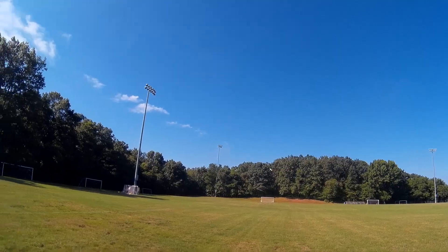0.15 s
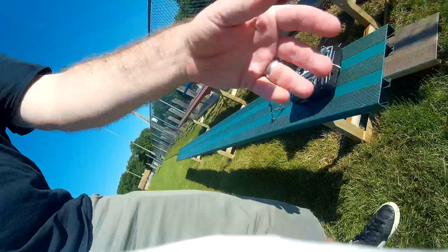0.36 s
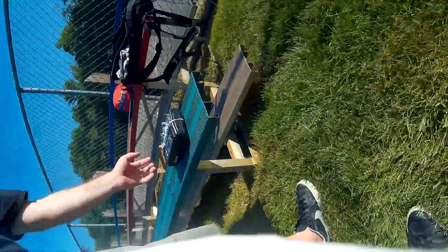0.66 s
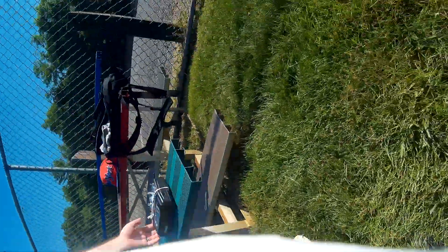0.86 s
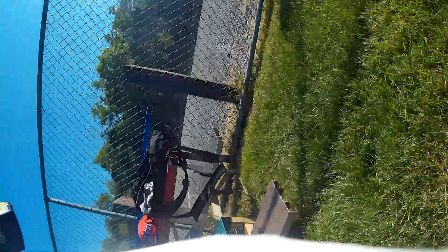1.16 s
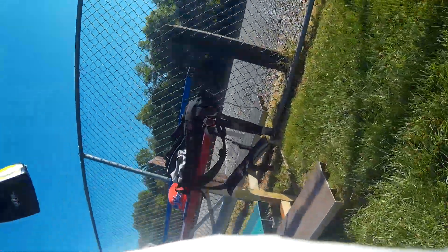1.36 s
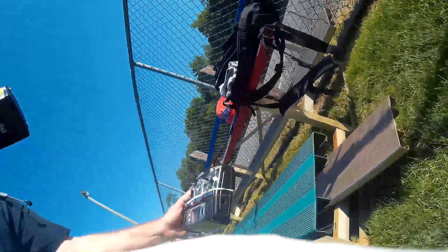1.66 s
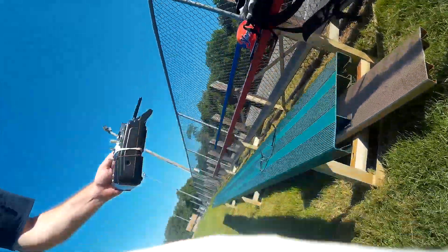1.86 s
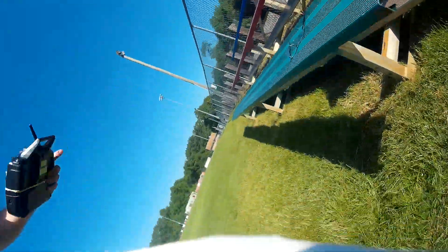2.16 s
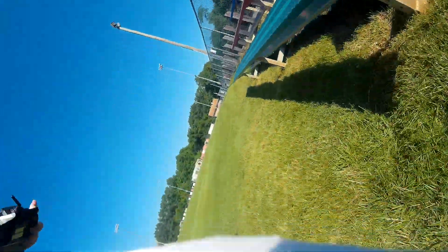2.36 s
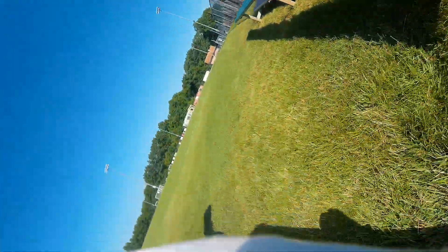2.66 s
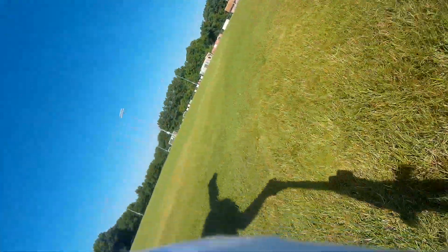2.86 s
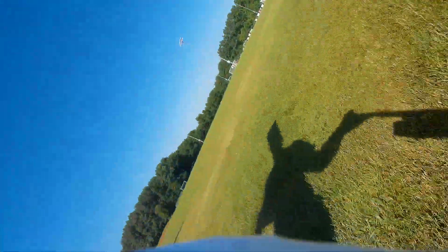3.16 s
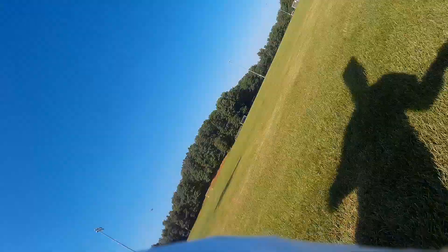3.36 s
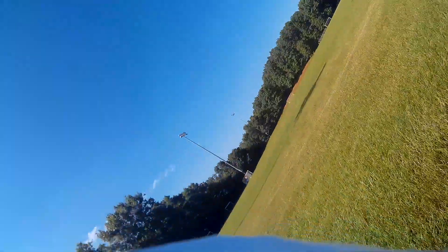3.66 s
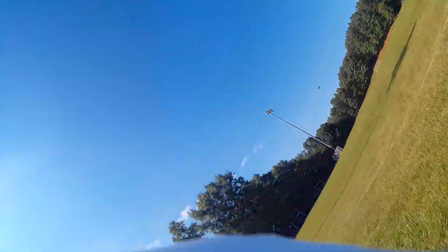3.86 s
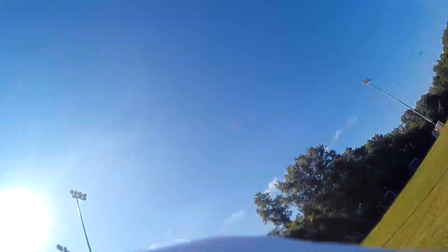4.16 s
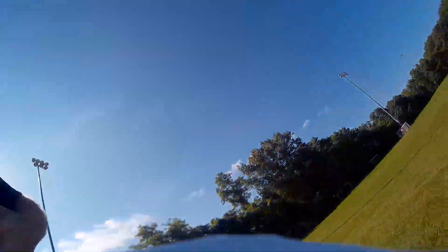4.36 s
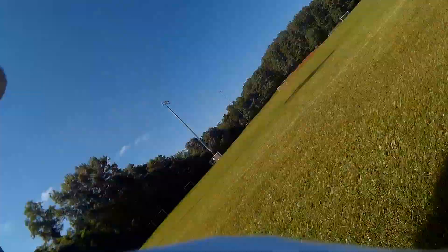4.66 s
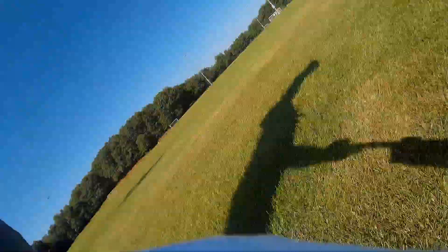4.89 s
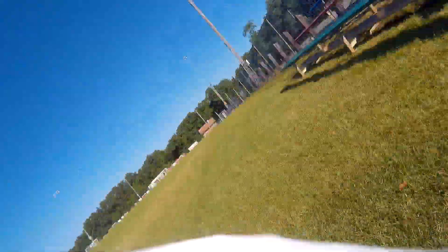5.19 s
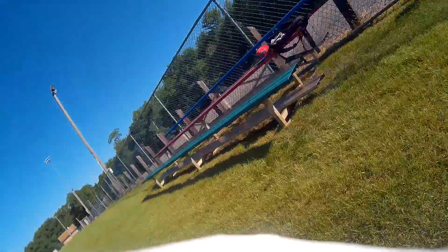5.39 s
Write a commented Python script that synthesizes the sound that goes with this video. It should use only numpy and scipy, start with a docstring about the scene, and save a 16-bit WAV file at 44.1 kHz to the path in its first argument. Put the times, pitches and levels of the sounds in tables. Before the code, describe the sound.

Faint breeze, bird chirps and handling ticks, then one sudden close blip of a small electric motor and propeller, cracking once and coasting to a stop.

```python
"""A light wind crosses an open field with birds, small handling ticks and a knock on a metal bench.
Then a model plane's brushless motor is blipped once, right beside the microphone on the airframe.
It kicks, rattles and squeals up to speed, the propeller buzzes, and it runs down under the controller's thin whistle.
One shaft angle times the motor, propeller and whistle; filtered noise, ringing modes and gliding tones make the rest."""
import sys
import numpy as np
from scipy import signal
from scipy.fft import rfft, irfft
from scipy.io import wavfile
from scipy.ndimage import uniform_filter1d

SR = 44100
rng = np.random.default_rng(int(sys.argv[2]) if len(sys.argv) > 2 else 0)


def log_audio(samples):
    """Write samples as a 16-bit WAV file to the path given in sys.argv[1]."""
    # one column per channel
    frames = np.atleast_2d(samples).T
    # limit to full scale, then quantise
    limited = np.clip(frames, -1, 1)
    pcm = np.round(limited * 32767).astype(np.int16)
    wavfile.write(sys.argv[1], SR, pcm)


N = 243873
TIME = np.arange(N) / SR
STOP_S = 4.815  # the rotor comes to rest

# motor drive, with a hesitation and then the cut: t/s, share of full drive
THROTTLE = [(3.562, 0.98), (3.575, 0.48), (3.6, 0.74), (3.64, 0.91), (3.8, 1), (3.95, 0)]
# shaft speed under power: t/s, rate/(turns per s)
SPIN_UP = [(3.39, 4.4), (3.46, 24.5), (3.55, 38.3), (3.61, 43.5), (3.65, 51.7), (3.7, 66.2), (3.75, 91.4),
           (3.8, 106.3), (3.87, 109)]
# short gliding tones: bearing squeals, and last a falling 6 kHz tone, perhaps the controller's:
# t/s, length/s, first f/Hz, last f/Hz, rms level before fades/dB, fall per overtone/dB
GLIDES = [(3.442, 0.019, 688, 780, -19.5, -14.5), (3.459, .014, 946, 990, -18.5, -10),
          (3.497, 0.011, 771, 700, -22, -5), (3.522, 0.022, 697, 802, -22.5, -7),
          (3.542, 0.02, 797, 824, -20, -5.5), (3.626, .057, 1000, 1028, -21, -3.5),
          (3.67, 0.034, 2570, 2684, -23, -11), (3.769, .07, 6030, 5616, -31.5, -35)]


def amp(db):
    """Turns decibels into an amplitude factor."""
    return 10 ** (np.asarray(db) / 20)


def unit(x):
    """Scales a sound to rms 1."""
    return x / np.sqrt(np.mean(x ** 2) + 1e-20)


def add(mix, s, sound):
    """Lays a sound into the mix at s seconds."""
    part = mix[max(round(s * SR), 0):][:len(sound)]
    part += sound[:len(part)]


def curve(rows):
    """Joins rows of t/s and value by straight lines in time."""
    return np.interp(TIME, *np.transpose(rows))


def during(start, end, fade=.004):
    """A gate with soft edges, all in seconds."""
    return np.clip((TIME - start) / fade, 0, 1) * np.clip((end - TIME) / fade, 0, 1)


def shape(points):
    """Makes rows of f/Hz and level/dB into a gain over frequency."""
    f, db = np.transpose(points)
    return lambda hz: amp(np.interp(np.log(hz + 1), np.log(f + 1), db))


def colour(x, gain, size=8192):
    """Minimum-phase filter with the given gain, so that clicks ring only afterwards."""
    log_gain = np.log(np.maximum(gain(abs(np.fft.fftfreq(size, 1 / SR))), 1e-5))
    spectrum = np.exp(np.conj(signal.hilbert(log_gain)))
    taps = np.fft.ifft(spectrum).real[:size // 2]
    return signal.oaconvolve(x, taps)[:len(x)]


def drift(hz):
    """Smooth random wander of rms 1, rolling off around the given rate."""
    rolloff = np.exp(-(np.fft.rfftfreq(N, 1 / SR) / hz) ** 2)
    return unit(irfft(rfft(rng.standard_normal(N)) * rolloff, N))


def steady(x, size=1100):
    """Evens a sound out to about rms 1, so that a level curve can play it."""
    power = uniform_filter1d(uniform_filter1d(x ** 2, size), size)
    return x / np.sqrt(abs(power) + 1e-5 * np.mean(x ** 2))


def pulses(cycles):
    """One click at each whole cycle, shared between the two nearest samples."""
    step = np.diff(cycles, prepend=cycles[0])
    hit = np.diff(np.floor(cycles), prepend=np.floor(cycles[0])) > 0
    early = hit * (cycles % 1) / np.maximum(step, 1e-9)
    return hit - early + np.roll(early, -1)


def blows(rows, gain, size=4096):
    """Single pushes, rows of t/s and peak level/dB, on a body with the given gain."""
    ring, out = colour(signal.unit_impulse(size), gain), np.zeros(N)
    for s, db in rows:
        add(out, s, amp(db) * ring / abs(ring).max())
    return out


def airframe(hz):
    """Gain of the resonances of the motor mount and fuselage."""
    # resonances: f/Hz, full width at half amplitude/Hz, relative level/dB
    resonances = [(464, 130, -0.5), (768, 202, 5.5), (1020, 520, 0), (1578, 400, -1), (2000, 82, -5.5),
                  (2970, 500, -7), (4230, 1000, -16.5), (5280, 180, -17.5), (5720, 1600, -17),
                  (11100, 2300, -46.5)]
    return np.sqrt(sum((amp(db) / (1 + ((hz - f) / (width / 2)) ** 2)) ** 2 for f, width, db in resonances))


def field_hush(level_db=-69.5):
    """The even hush of the open field: steady filtered noise."""
    # tone of the field: f/Hz, relative level/dB
    field_tone = [(12, -44.5), (20, -16), (126, -6), (350, -23.5), (413, -18), (591, -21.5), (3080, -27.5),
                  (4290, -27.5), (5200, -27), (5810, -29.5), (12500, -30.5), (14400, -34)]
    return unit(colour(rng.standard_normal(N), shape(field_tone))) * amp(level_db)


def low_swells(calm_db=-70.5, lumps_db=1.5):
    """Lumpy low noise that swells and fades: puffs of wind, and at 3.2 s a hand rubbing the fuselage."""
    # tone of the swells: f/Hz, relative level/dB
    low_tone = [(12, -30.5), (25, -4.5), (70, -3.5), (120, -7.5), (200, -12), (450, -23.5), (900, -26.5),
                (1700, -29.5), (2500, -60)]
    # puffs of wind, and at 3.2 s the rub of a hand: peak t/s, rise/s, fall/s, level/dB
    swells = [(.7, .25, 0.19, -63.5), (1.43, .1, 0.25, -52.5), (3.2, 0.096, 0.18, -55),
              (4.65, .5, 0.41, -53.5), (5.41, .15, .09, -55.5)]
    lumpy = unit(colour(rng.standard_normal(N), shape(low_tone)) * amp(lumps_db * drift(21)))
    levels = [amp(db) * np.exp(-np.maximum((s - TIME) / rise, (TIME - s) / fall)) for s, rise, fall, db in swells]
    # a calm breeze stays between the swells
    return lumpy * np.sqrt(amp(calm_db) ** 2 + np.sum(np.square(levels), axis=0))


def birds(rasp=0.13, linger=1.6, echo_db=-6.0, echo_t60=0.5):
    """Gliding whistles that linger near their top pitch, some raspy, with an echo from the trees."""
    # bird notes: t/s, length/s, first f/Hz, last f/Hz, level/dB, roughness as a share of rasp
    notes = [(0.062, 0.2, 5260, 5100, -87, 0.1), (.425, 0.056, 5400, 5220, -74, .2),
             (0.611, .07, 3480, 3090, -68.5, .16), (.66, .074, 3180, 2750, -54.5, 0.17),
             (0.778, 0.037, 3900, 2330, -68.5, 1.11), (1.503, 0.087, 2790, 2410, -68.5, 0.2),
             (1.599, 0.078, 2750, 2950, -76, 0.2), (1.664, .045, 1740, 2950, -74, 0.1),
             (1.871, 0.048, 3060, 3590, -72.5, 0.48), (1.899, 0.12, 4030, 4290, -73, 0.18),
             (1.997, 0.048, 5330, 5580, -76, 0.26), (2.683, .063, 3550, 2280, -70, 0.2),
             (2.796, .032, 2700, 2250, -72.5, .1), (2.903, 0.11, 3720, 3950, -80, 0.44),
             (5.243, 0.052, 4750, 3750, -64.5, 0.54), (5.303, 0.061, 5260, 6400, -69.5, 0.68),
             (5.419, 0.0274, 1710, 2550, -68, 0), (5.431, 0.078, 2520, 2715, -57.5, 0.3)]
    out = np.zeros(N)
    for s, length, first_hz, last_hz, db, rough in notes:
        count = int(length * SR)
        top_hz, span_hz = max(first_hz, last_hz), abs(last_hz - first_hz) + 1
        below = (top_hz - np.linspace(first_hz, last_hz, count)) / span_hz
        glide_hz = top_hz - span_hz * abs(below) ** linger
        hz = glide_hz * (1 + rasp * rough * drift(600)[:count])
        whistle = np.sin(2 * np.pi * np.cumsum(hz) / SR)
        add(out, s, amp(db) * unit(whistle * signal.windows.tukey(count, .6)))
    trees = rng.standard_normal(SR) * amp(-60 * TIME[:SR] / echo_t60)
    return out + amp(echo_db) * signal.oaconvolve(out, trees / np.linalg.norm(trees))[:N]


def ticks(spread=0.54):
    """Sharp ticks of plastic and grit: tiny dying bursts of noise, each around its own pitch."""
    # ticks: t/s, peak level/dB, centre f/Hz, time to fall 60 dB/s
    clicks = [(.526, -54.5, 6000, 0.011), (0.586, -57, 1500, 0.044), (.714, -49.5, 970, 0.18),
              (0.74, -56, 1970, .04), (0.938, -52.5, 1610, 0.029), (1.013, -55.5, 1170, 0.08),
              (1.089, -51, 1390, 0.048), (1.16, -53, 1840, 0.024), (1.2837, -41.5, 11000, 0.0065),
              (1.334, -46.5, 5760, .03), (1.387, -53, 4500, 0.021), (2.014, -57, 800, 0.034),
              (3.133, -54.5, 4080, 0.027), (3.314, -55, 3500, 0.022), (4.543, -50, 5400, .015)]
    out, t = np.zeros(N), TIME[:SR // 10]
    for s, db, centre_hz, t60 in clicks:
        burst = rng.standard_normal(len(t)) * amp(-60 * t / t60)
        tick = colour(burst, lambda hz: 1 / (1 + (np.log((hz + 1) / centre_hz) / spread) ** 2))
        add(out, s, amp(db) * tick / abs(tick).max())
    return out


def rustles(grain_db=3, grain_hz=40):
    """Faint, uneven swells of rubbing, perhaps clothes and grass: grainy filtered noise."""
    # swells: peak t/s, half length/s, level/dB
    strokes = [(0.747, 0.096, -67.5), (1.065, .12, -69), (1.974, 0.11, -70.5), (2.805, 0.16, -72)]
    # tone of the rubbing: f/Hz, relative level/dB
    rub_tone = [(200, -22), (500, -2), (800, -1), (1350, -0.5), (1750, -5), (2200, -21), (5000, -14),
                (12000, -38)]
    level = sum(amp(db) * np.exp(-((TIME - s) / half) ** 2) for s, half, db in strokes)
    return unit(colour(rng.standard_normal(N), shape(rub_tone)) * amp(grain_db * drift(grain_hz))) * level


def bench(s=1.334, ring_db=-46.5, clatter_db=-47, clatter_t60=0.59,
          blow_db=-33, blow_hz=1480, blow_t60=0.039, rise_s=0.00064):
    """A knock on the metal bench: a hard, short note, a dense clatter and a few lasting modes."""
    # ringing modes: f/Hz, level relative to ring_db/dB, time to fall 60 dB/s
    modes = [(515, -13.5, 1.3), (707, -13.5, 0.74), (730, -21, 0.66), (953, -5, 0.82), (1103, -7.5, 0.54),
             (1342, 0, 0.14), (1400, -14.5, 1.26), (1530, -14, 0.51), (1730, -5, 0.37), (1760, -7, 0.24),
             (2120, -11, 0.16)]
    # tone of the clatter: f/Hz, relative level/dB
    clatter_tone = [(88, -48), (150, -4), (359, -9), (449, -12), (524, -8.5), (938, -4.5), (1190, -4),
                    (1410, -5.5), (2450, -20), (2760, -16), (9000, -53), (11700, -73), (19800, -120)]
    out, t = np.zeros(N), TIME[:SR]
    ring = sum(amp(db - 60 * t / t60) * np.sin(2 * np.pi * (hz * t + rng.random())) for hz, db, t60 in modes)
    blow = amp(blow_db - 60 * t / blow_t60) * np.sin(2 * np.pi * blow_hz * t)
    noise = unit(colour(rng.standard_normal(SR), shape(clatter_tone)))
    clatter = amp(clatter_db - 60 * t / clatter_t60) * noise
    add(out, s, (amp(ring_db) * ring + blow + clatter) * np.minimum(t / rise_s, 1))
    return out


def bumps():
    """Soft bumps of the hand, each a dull push on the fuselage."""
    # bumps: t/s, peak level/dB
    pushes = [(1.724, -53.5), (3.139, -46.5), (3.175, -41.5), (3.19, -42), (3.208, -47), (3.2225, -38),
              (3.315, -42), (5.011, -51.5)]
    # tone of a push: f/Hz, relative level/dB
    thud_tone = [(30, -31), (130, 5.5), (350, 2.5), (800, -14.5), (1600, -23), (3000, -41), (12000, -66)]
    return blows(pushes, shape(thud_tone))


def shaft(friction_hz_per_s=54, drag_per_turn=.024):
    """Turns per second: driven up to speed, then slowed by friction plus air drag x rate squared."""
    cut_s, top_hz = SPIN_UP[-1]
    even_hz = np.sqrt(friction_hz_per_s / drag_per_turn)  # here drag equals friction
    angle = np.arctan(top_hz / even_hz) - even_hz * drag_per_turn * np.maximum(TIME - cut_s, 0)
    return np.where(TIME < cut_s, curve(SPIN_UP), np.maximum(even_hz * np.tan(angle), 1))


def pace():
    """Shaft speed as a share of full speed."""
    return shaft() / SPIN_UP[-1][1]


def loudness(law, settle_hz=16.7, settle_db=-4.5):
    """Gain that grows with speed, passing from the driven law to the coasting one as the power is cut."""
    driven, coasting = (db + slope_db * np.log10(pace()) for db, slope_db in law)
    # coasting slowly, the loose rotor settles and turns quieter
    coasting = coasting + settle_db / (1 + (shaft() / settle_hz) ** 20)
    return amp(coasting + curve(THROTTLE) * (driven - coasting))


def controller(turns, wake_s=3.363, carrier_hz=7979, rest_db=-57, rise_db=17, coasting_db=-56.0,
               fade_hz=23, fade_power=2.0, depth=0.5, cog_db=10, beat=.45, beat_hz=50, flicker=0.31):
    """The switching whistle swells and its sidebands spread with speed; coasting, it throbs and dies with the rotor."""
    coasting = 1 - curve(THROTTLE)
    driven = amp(rest_db + rise_db * np.sqrt(pace()))
    freewheeling = amp(coasting_db) * np.minimum(shaft() / fade_hz, 1) ** fade_power
    level = ((1 - coasting) * driven + coasting * freewheeling) * during(wake_s, STOP_S)
    carrier = np.exp(2j * np.pi * carrier_hz * TIME) * level
    magnets = np.cos(2 * np.pi * 14 * turns) * np.minimum(shaft() / 20, 1)
    throb = beat * coasting * np.exp(-2j * np.pi * beat_hz * TIME)
    whistle = np.sqrt(2) * (carrier * (1 + depth * magnets + throb + flicker * drift(150))).real
    # the airframe's resonances bring out the cog sideband as it crosses them
    cogs = (carrier * coasting * np.exp(-2j * np.pi * 84 * turns)).real
    return whistle + amp(cog_db) * colour(cogs, airframe)


def kicks(rebound_s=0.00368, rebound_db=-5, dull_hz=1500):
    """The rotor jerks the airframe, and falls back more softly a moment later."""
    # starting jerks and the last cog of the rotor: t/s, peak level/dB
    jerks = [(3.3645, -26), (3.375, -21.5), (3.395, -21), (4.814, -50.5), (4.8244, -42.5)]
    rebounds = [(s + rebound_s, db + rebound_db) for s, db in jerks]
    hard = blows(jerks, lambda hz: airframe(hz) ** 1.57)
    soft = blows(rebounds, lambda hz: airframe(hz) / (1 + (hz / dull_hz) ** 2))
    return hard + soft


def rattle(turns, weak=0.083, uneven=0.5, scrape=0.18, loose=.003, cogging=.15, reference_hz=45,
           repeat=0.71, pits_hz=1100, size=160, chatter_db=1):
    """42 commutation steps a turn, strong and weak by turns, shake the airframe; bearing scrape grows with speed."""
    # driven row, then coasting row: level at full speed/dB, slope per tenfold speed/dB
    speed_law = [(-19.5, 12), (-30.5, 31.5)]
    speed = shaft() / reference_hz
    angle = 21 * (turns + loose * speed * drift(250))  # the rotor shudders in its bearings
    steps = (pulses(angle) + weak * pulses(angle + .5)) * (1 + uneven * rng.standard_normal(N))
    loose_drive = steps * (cogging + curve(THROTTLE)) + scrape * speed * rng.standard_normal(N)
    # the same pits in the bearing come round every turn, and rule the scrape at high speed
    depths = rng.standard_normal(size)[np.round(size * turns).astype(int) % size]
    pit_hits = pulses(size * turns) * depths
    pits = steady(colour(pit_hits, lambda hz: airframe(hz) * hz ** 2 / (hz ** 2 + pits_hz ** 2)))
    share = np.clip(repeat * pace() ** 0.74, 0, 1)
    # the rattle swells during each short gliding tone, most at low speed
    gliding = np.max([during(s, s + length) for s, length, *_ in GLIDES], axis=0)
    level = loudness(speed_law) * amp(chatter_db * gliding * (1.5 - share))
    return (np.sqrt(1 - share) * steady(colour(loose_drive, airframe)) + np.sqrt(share) * pits) * level


def whine(turns, driven_flutter=.45, coasting_flutter=.4, flutter_hz=60,
          driven_top_hz=5100, coasting_top_hz=2450, low_hz=520, resonant=.85):
    """Fluttering magnetic orders swell as they sweep through the resonances; without current the high ones fade."""
    # magnetic orders: multiple of shaft rate (pitch rounds it), relative level driven/dB, coasting/dB
    orders = [(12, -13.5, -6), (13, -18, -5), (14, -16, -1), (20, -2.5, -14.5), (21, -0.5, -12.5),
              (36, 4, -13), (38, -2, -4), (40, -5.5, -9), (42.33, 7.5, 1), (44.3, -9.5, -12),
              (84.4, -4.5, -5.5)]
    # driven row, then coasting row: gain at full speed/dB, slope per tenfold speed/dB
    speed_law = [(-18.5, 30), (-32, 19)]
    power, rate, lines = curve(THROTTLE), shaft(), 0
    top_hz = power * driven_top_hz + (1 - power) * coasting_top_hz
    flutter = power * driven_flutter + (1 - power) * coasting_flutter
    for k, driven_db, coasting_db in orders:
        level = amp(power * driven_db + (1 - power) * coasting_db) / (1 + (k * rate / top_hz) ** 10)
        swell = level * (1 + flutter * (drift(flutter_hz) + 1j * drift(flutter_hz)))
        lines = lines + (swell * np.exp(2j * np.pi * (round(k) * turns + rng.random()))).real
    body = colour(lines, lambda hz: airframe(hz) ** resonant * hz ** 6 / (hz ** 6 + low_hz ** 6))
    return body * loudness(speed_law)


def propeller(turns, slap_db=-26.0, slap_power=3.9, hiss_db=-25, hiss_power=2.55, second_blade=0.77, chop=0.71,
              waver=.16, low_hz=62, hum_power=0.23, power_per_multiple=1.11, steepest=4.94):
    """Two blades hum, slap the air and chop their own hiss, all growing with speed, the higher tones most steeply."""
    # hum: multiple of the shaft rate, level at full speed before the bass cut/dB
    tones = [(1, -37), (2, -34), (3, -44), (4, -27), (5, -31), (6, -28.5), (7, -40.5), (8, -21), (10, -31),
             (12, -30), (14, -30.5), (16, -30)]
    # tone of the slaps: f/Hz, relative level/dB
    slap_tone = [(100, -28), (400, -17), (900, -6), (1600, 0.5), (2350, -6), (3000, -6.5), (4700, -5.5),
                 (8000, -15), (13500, -36)]
    # tone of the hiss: f/Hz, relative level/dB
    hiss_tone = [(150, -34.5), (500, -8), (1000, -3), (1700, -2.5), (2400, -9), (3000, -6.5), (3700, -18),
                 (5500, -13), (8000, -21.5), (12000, -22), (14400, -32)]
    speed, hum = pace(), 0
    for k, db in tones:
        level = amp(db) * speed ** min(hum_power + power_per_multiple * k, steepest)
        hum = hum + level * (1 + waver * drift(25)) * np.sin(2 * np.pi * (round(k) * turns + rng.random()))
    # a small propeller cannot radiate deep bass
    hum = colour(hum, lambda hz: hz ** 6 / (hz ** 6 + low_hz ** 6))
    # each pass tears a short puff
    passes = (pulses(turns) + second_blade * pulses(turns + .5)) * (1 + 0.23 * rng.standard_normal(N))
    puffs = signal.lfilter([1], [1, -np.exp(-1 / (0.00041 * SR))], passes) * rng.standard_normal(N)
    slaps = steady(colour(puffs, shape(slap_tone))) * amp(slap_db) * speed ** slap_power
    chopped = rng.standard_normal(N) * np.exp(chop * speed * np.cos(2 * np.pi * 2 * turns))
    hiss = steady(colour(chopped, shape(hiss_tone))) * amp(hiss_db) * speed ** hiss_power
    return hum + slaps + hiss


def gliding_tones(waver=0.01):
    """The bearing catches and sings short tones with overtones; a falling 6 kHz tone, perhaps the controller's, ends them."""
    out = np.zeros(N)
    for s, length, first_hz, last_hz, db, fall_db in GLIDES:
        count = int(length * SR)
        hz = np.linspace(first_hz, last_hz, count) * (1 + waver * drift(280)[:count])
        phase = 2 * np.pi * np.cumsum(hz) / SR
        tone = sum(amp(fall_db * k) * np.sin((k + 1) * phase + 2 * np.pi * rng.random()) for k in range(6))
        add(out, s, amp(db) * unit(tone) * signal.windows.tukey(count, .45))
    return out


def snap(s=3.9855, db=-7.5, t60=.006, size=2048):
    """One sharp crack of plastic as the airframe is shaken: a brief burst of filtered noise."""
    out = np.zeros(N)
    burst = rng.standard_normal(size) * amp(-60 * TIME[:size] / t60)
    # f/Hz, relative level/dB
    tone = [(300, -31), (2500, -14.5), (4200, 8.0), (5800, -2), (8000, -5), (12000, -15.0), (14500, -29)]
    crack = colour(burst, shape(tone))
    add(out, s, amp(db) * crack / abs(crack).max())
    return out


def scene():
    """One shaft angle drives the motor, the propeller and the controller's sidebands."""
    surroundings = field_hush() + low_swells() + birds() + rustles() + bench()
    hands = ticks() + bumps()
    running = during(SPIN_UP[0][0], STOP_S)
    turns = np.cumsum(shaft() * running * (1 + .004 * drift(40))) / SR
    spinning = (rattle(turns) + whine(turns) + propeller(turns)) * running
    motor = controller(turns) + kicks() + spinning + gliding_tones()
    return (surroundings + hands + motor + snap())[None]


def record(dry, edge_hz=14450):
    """The recorder's band limit: a steep low-pass."""
    return signal.oaconvolve(dry, signal.firwin(301, edge_hz, window=("kaiser", 8), fs=SR)[None], "same")


dry = scene()
out = record(dry)
log_audio(out)
```